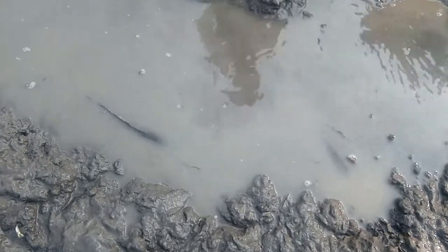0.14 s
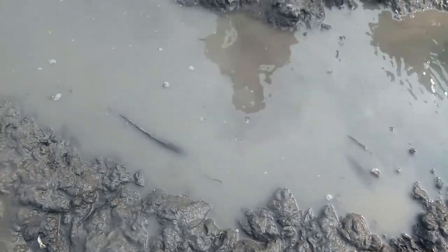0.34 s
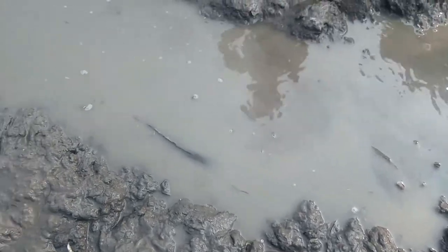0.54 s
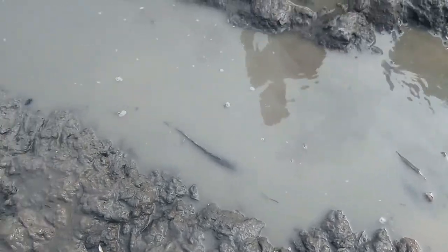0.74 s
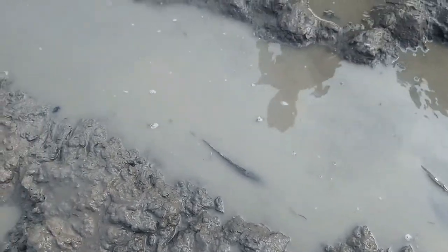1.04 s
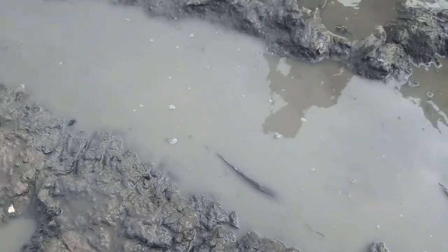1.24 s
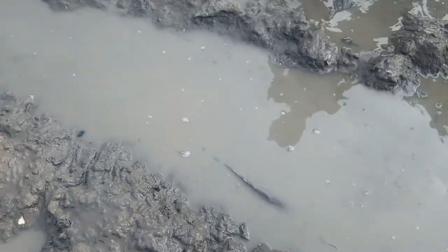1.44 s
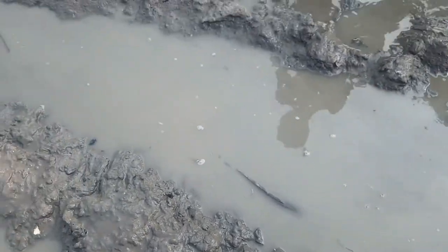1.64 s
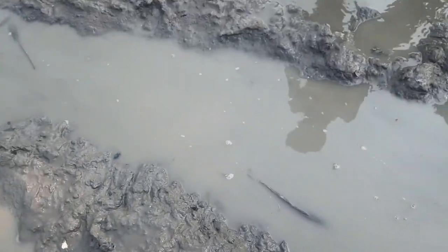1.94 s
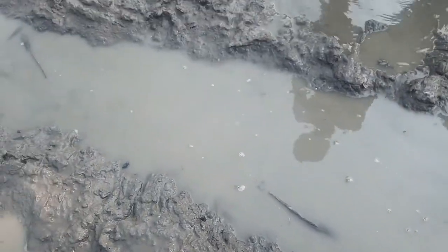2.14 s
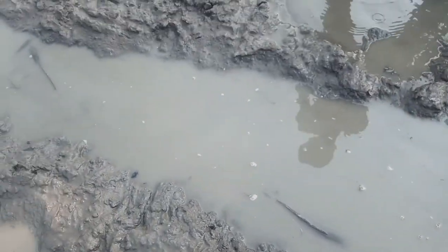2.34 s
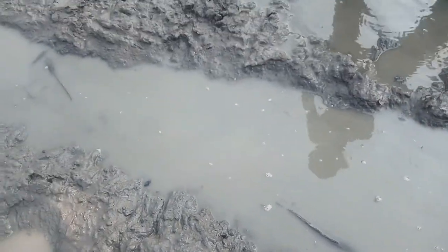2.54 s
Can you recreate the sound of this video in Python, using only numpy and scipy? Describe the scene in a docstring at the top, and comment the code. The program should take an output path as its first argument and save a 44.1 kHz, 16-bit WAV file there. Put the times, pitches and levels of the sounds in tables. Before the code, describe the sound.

Wading feet splash through shallow muddy water, with wet slaps, spray and small gurgling glugs

```python
"""Wading through a muddy pond

Feet wade through the shallow muddy water of a drained pond, a few metres away, in the open.
Twice a sheet of water is swept up as spray (dense tiny ringing bubbles), and lumps of wet mud slap
down (noise bursts with dull thuds). In between, water churns and sloshes (bubbles and rough hiss), and
air pockets glug (gliding tones). Banks scatter the sound; a light breeze (low noise) touches the microphone."""
import sys
import numpy as np
from scipy import signal
from scipy.fft import rfft, irfft
from scipy.io import wavfile

SR = 44100
rng = np.random.default_rng(int(sys.argv[2]) if len(sys.argv) > 2 else 0)


def persist_wave(psi):
    """Save psi, clipped to +-1, as 16-bit WAV."""
    counts = np.round(np.clip(psi, -1, 1) * 32767).astype(np.int16)
    wavfile.write(sys.argv[1], SR, np.atleast_2d(counts).T)


N = 119070
TIME = np.arange(N) / SR
IMPACT_ATTACK_S = .0009   # how quickly slaps and thuds build up


def from_db(db):
    """Turn decibels into gain."""
    return 10 ** (np.asarray(db) / 20)


def rms_one(x):
    """Scale a sound to unit power."""
    return x / np.sqrt(np.mean(x ** 2) + 1e-20)


def level(rows):
    """Follow a (time_s, level_db) curve, silent more than 0.03 s outside it."""
    times, db = np.transpose(rows)
    active = (TIME > times[0] - .03) * (TIME < times[-1] + .03)
    return from_db(np.interp(TIME, times, db)) * active


def colour(x, points):
    """Filter a sound by a (frequency_hz, level_db) curve, then set unit power."""
    hz, db = np.transpose(points)
    f = np.fft.rfftfreq(len(x), 1 / SR) + 1   # the 1 avoids log(0)
    gain = from_db(np.interp(np.log(f), np.log(hz), db))
    return rms_one(irfft(rfft(x) * gain, len(x)))


def noise(length):
    """Make white noise: independent random samples."""
    return rng.standard_normal(length)


def add(out, start_s, sound):
    """Mix a sound in at its start time."""
    i = int(np.clip(start_s * SR, 0, N - 1))
    out[i:i + len(sound)] += sound[:N - i]


def flicker(x):
    """Roughen a sound: each half octave flickers quickly in level at random."""
    depth_db, speed_hz = 2.5, 45
    octave = np.log2(np.fft.rfftfreq(N, 1 / SR) + 1)
    centres = np.arange(8, 14.1, .5)
    slow = signal.butter(2, speed_hz, fs=SR, output="sos")
    spectrum, out = rfft(x), np.zeros(N)
    for weights in np.eye(len(centres)):
        wander = rms_one(signal.sosfilt(slow, noise(N)))
        band = irfft(spectrum * np.interp(octave, centres, weights), N)
        out += band * from_db(depth_db * wander)
    return rms_one(out)


def droplets(per_s, spread_db, cycles, hiss):
    """Random clicks ring tiny bubbles, the small high ones most often; a share of hiss joins, all flickering."""
    pitches = np.geomspace(300, 14000, 44)
    shares = pitches ** .7 / np.sum(pitches ** .7)
    out = np.zeros(N)
    for hz, share in zip(pitches, shares):
        count = int(per_s * share * N / SR) + 1
        when, size, sign = rng.random((count, 3)).T
        loudness_db = spread_db * np.minimum(-np.log(1 - size), 3.5)   # few are loud
        sizes = from_db(loudness_db) * np.sign(sign - .5)
        clicks = np.bincount((when * N).astype(int), sizes, N) + 1e-12 * TIME   # never all zero
        # Each click rings at this pitch, fading 60 dB in the given number of cycles.
        r, w = from_db(-60 * hz / (cycles * SR)), 2 * np.pi * hz / SR
        ringing = signal.lfilter([1, 0, -1], [1, -2 * r * np.cos(w), r * r], clicks)
        out += np.sqrt(hz) * rms_one(ringing)   # higher bands are wider, so need more power
    return flicker(np.sqrt(1 - hiss) * rms_one(out) + np.sqrt(hiss) * noise(N))


def spray():
    """Each sheet of water swells and rains back as dense fine drops, heard as many brief rings."""
    # Loudness of each sheet: time_s, level_db
    sheets = [
        [(.185, -62), (.2, -42), (.228, -42), (.255, -36), (.325, -30.5), (.375, -37.5), (.44, -36), (.53, -64),
         (.68, -52)],
        [(1.67, -76), (1.745, -71), (1.76, -35.5), (1.82, -38), (1.9, -34), (1.945, -32.5), (2.0, -41.5),
         (2.09, -63), (2.16, -74)],
    ]
    # Tone of each sheet: frequency_hz, level_db (relative, per Hz)
    sheet_tones = [
        [(100, -18.5), (200, -9), (400, -11.5), (900, -9.5), (1600, -5), (3000, -2.5), (5000, -8), (6500, -8),
         (16000, -12)],
        [(100, -13), (200, -9.5), (400, -7.5), (900, -5), (1600, 1), (3500, 0), (5000, -4.5), (6500, -7),
         (16000, -10.5)],
    ]
    out = np.zeros(N)
    for sheet, tone in zip(sheets, sheet_tones):
        drops = droplets(per_s=6000, spread_db=3, cycles=9.9, hiss=.44)
        out += level(sheet) * colour(drops, tone)
    return out


def slaps():
    """A lump hits water: a crackling burst with uneven crater resonances, then a weak splatter tail."""
    # Slaps of mud and water: start_s, level_db (at the envelope's peak), decay_s, centre_hz, width_octaves
    slap_events = [(.001, -42.5, 0.012, 3520, 1.04), (0.093, -38.5, 0.0035, 3270, 0.13),
                   (0.191, -41, 0.014, 4550, 1), (.235, -31.5, 0.009, 4100, 1.6),
                   (.262, -29.5, 0.0045, 2850, 0.3), (0.4814, -22, 0.0085, 5940, 1.33),
                   (0.511, -29, 0.0011, 3680, 0.55), (0.5171, -22, 0.0041, 2530, 1.1),
                   (0.618, -39, 0.0055, 3800, 0.5), (0.889, -39, 0.017, 2970, 0.55),
                   (0.985, -36.5, 0.0032, 3910, 0.42), (1.1527, -30.5, 0.0032, 2750, 0.27),
                   (1.1575, -36, 0.0016, 1980, 0.36), (1.201, -31, 0.0028, 4100, 0.32),
                   (1.2329, -33, 0.0046, 1300, 0.74), (1.245, -34, .006, 1900, 0.87),
                   (1.287, -40, 0.015, 2220, 1.5), (1.336, -33.5, 0.0044, 3430, 0.71),
                   (1.382, -27, 0.0046, 3900, 0.62), (1.404, -31, 0.0085, 4500, 0.57),
                   (1.4436, -32.5, 0.0019, 4380, 0.44), (1.471, -40, 0.0047, 4470, 0.27),
                   (1.4932, -37.5, 0.0034, 4100, 0.23), (1.511, -31, 0.0023, 2400, 0.75),
                   (1.532, -39, .003, 4500, 0.17), (1.551, -33.5, 0.0032, 5050, 2.4),
                   (1.684, -40, .004, 3520, 0.63), (1.709, -34.5, .008, 4900, 0.89),
                   (1.753, -33.5, 0.0083, 2810, 0.45), (1.898, -31.5, 0.0085, 2950, 0.95),
                   (2.0395, -16.5, 0.0064, 4260, 1.8), (2.0618, -19.5, 0.0047, 3150, 0.76),
                   (2.093, -30.5, 0.0063, 3500, 1.6), (2.156, -40.5, .003, 3940, 0.15),
                   (2.1799, -38.5, 0.0037, 3300, 1.4), (2.211, -43.5, 0.0072, 2070, 0.61),
                   (2.246, -41.5, .003, 4500, 2.7), (2.292, -43.5, 0.014, 2800, 0.91),
                   (2.3206, -42, 0.0098, 3240, 0.23), (2.34, -36.5, 0.0073, 3400, .9),
                   (2.359, -28.5, 0.0037, 3630, 1.3), (2.383, -35, 0.0047, 4000, 0.38),
                   (2.418, -37, 0.007, 3780, 0.21), (2.465, -42, 0.0042, 3740, 0.62),
                   (2.581, -45.5, 0.0021, 3840, 0.48), (2.652, -39.5, 0.0073, 1790, 0.55),
                   (2.67, -45.5, 0.0086, 3680, 0.2)]
    skirt_db, splatter_db, splatter_s = -17, -14, .02
    uneven_db, ring_width_hz = 8, 200    # chance resonances of the splash crater
    crackle_db, crackle_s = 2, .00104    # the slap breaks into many tiny impacts
    out, t = np.zeros(N), TIME[:SR // 6]
    f = np.fft.rfftfreq(len(t), 1 / SR) + 1
    attack = 1 - np.exp(-(t / IMPACT_ATTACK_S) ** 2)
    splatter = from_db(splatter_db) * np.exp(-t / splatter_s)
    for start_s, db, decay_s, hz, octaves in slap_events:
        bumps = np.interp(f / ring_width_hz, np.arange(200), rng.uniform(-1, 1, size=200))
        crater = from_db(uneven_db * bumps)
        shape = np.exp(-.5 * (np.log2(f / hz) / octaves) ** 2) + from_db(skirt_db)
        burst = rms_one(irfft(rfft(noise(len(t))) * shape * crater, len(t)))
        envelope = attack * (np.exp(-t / decay_s) + splatter)
        crackle = from_db(crackle_db * np.interp(t / crackle_s, np.arange(300), noise(300)))
        size = from_db(db) * np.sqrt(np.mean(envelope ** 2)) / envelope.max()
        add(out, start_s, size * rms_one(burst * crackle * envelope))
    return out


def thuds():
    """Heavy lumps push the water: short, dull bursts of low noise."""
    # Pushes of heavy lumps: start_s, level_db (at the envelope's peak)
    thud_events = [(0.481, -30.5), (0.515, -39), (2.04, -42), (2.179, -46)]
    # Tone of the push: frequency_hz, level_db (relative, per Hz)
    thud_tone = [(40, -28), (120, -14), (280, 13.5), (500, -2.5), (1200, -3), (5000, -60)]
    decay_s = .0028
    out, t = np.zeros(N), TIME[:SR // 10]
    envelope = (1 - np.exp(-t / IMPACT_ATTACK_S)) * np.exp(-t / decay_s)
    envelope /= envelope.max()
    for start_s, db in thud_events:
        add(out, start_s, from_db(db) * envelope * colour(noise(len(t)), thud_tone))
    return out


def churn():
    """Stirred water trickles: mostly rough, flickering hiss, with small bubbles that ring for many cycles."""
    # How hard the water churns: time_s, level_db
    churn_level = [(0, -44), (.06, -47), (.16, -50), (.5, -38.5), (.62, -45), (.75, -45), (.9, -45),
                   (1.0, -48.5), (1.06, -54), (1.1, -49.5), (1.145, -48.5), (1.19, -36.5), (1.25, -40),
                   (1.36, -43), (1.41, -40.5), (1.52, -44), (1.64, -55.5), (1.75, -42.5), (1.95, -55),
                   (2.12, -44), (2.25, -57), (2.36, -47.5), (2.45, -52.5), (2.53, -55), (2.64, -57.5),
                   (2.67, -51), (2.7, -46)]
    # Tone of the trickle: frequency_hz, level_db (relative, per Hz)
    churn_tone = [(150, -16), (400, -26.5), (800, -19.5), (1500, -1.5), (3000, 2.5), (5000, -2.5),
                  (6500, -4.5), (16000, -2.5)]
    trickle = droplets(per_s=1800, spread_db=4, cycles=52, hiss=.7)
    return level(churn_level) * colour(trickle, churn_tone)


def slosh():
    """The body of water shoved round the legs gurgles: crowded bubbles, coloured towards low pitches."""
    # How hard the water sloshes: time_s, level_db
    slosh_level = [(0, -55.5), (.16, -60.5), (.22, -62), (.255, -39), (.295, -39.5), (.33, -31.5),
                   (.375, -43), (.44, -50), (.56, -50.5), (.7, -60.5), (.8, -55.5), (.89, -47.5),
                   (.99, -49.5), (1.08, -67.5), (1.16, -50), (1.24, -45.5), (1.34, -47), (1.44, -56.5),
                   (1.66, -66.5), (1.82, -45.5), (1.94, -55), (2.03, -54.5), (2.15, -62), (2.26, -62.5),
                   (2.36, -47.5), (2.5, -55), (2.6, -59.5), (2.7, -55.5)]
    # Tone of the gurgle: frequency_hz, level_db (relative, per Hz)
    slosh_tone = [(100, -31), (220, -5), (350, -6), (600, -1.5), (900, -2), (1300, -4), (2200, -8.5),
                  (5000, -30)]
    bubbles = droplets(per_s=10000, spread_db=2, cycles=17, hiss=.22)
    return level(slosh_level) * colour(bubbles, slosh_tone)


def glugs():
    """Trapped air rings with a rough wobble in loudness, mostly rising in pitch as it nears the surface."""
    # Air pockets and large bubbles: start_s, pitch_hz (at the start), level_db (envelope peak),
    # ring_s (to fade 60 dB), rise_octaves_per_s (at the start)
    pockets = [(.78, 194.4, -48, 0.31, -3.5), (0.804, 1033, -37, 0.045, 2), (0.828, 282, -30.5, 0.034, 9),
               (0.84, 330, -40, 0.15, 0), (0.87, 1430, -38.5, 0.013, 19), (0.879, 1025, -27.5, 0.026, 4.5),
               (.881, 617, -26, 0.014, 15), (.886, 275, -38.5, 0.047, 4), (.889, 503, -28.5, 0.044, 29),
               (0.918, 1030, -44, 0.031, -1), (.95, 1005, -44.5, 0.062, -7), (.973, 946, -36, 0.016, 0),
               (.977, 720, -36.5, 0.064, 1), (.993, 1855, -35.5, 0.016, -8), (.998, 722, -41, 0.034, 2),
               (1.049, 1220, -41, 0.044, 11), (1.126, 950, -42, 0.028, 25), (1.171, 616, -33.5, 0.026, 0),
               (1.207, 559, -31, 0.094, 1.5), (1.208, 253, -38, 0.092, 9), (1.195, 1315, -40, 0.019, 0),
               (1.246, 1048, -38, 0.055, 11), (1.256, 270.3, -40, 0.33, 17.5), (1.282, 275, -37, 0.056, 3),
               (1.286, 2034, -35, 0.063, 3.5), (1.306, 301, -27.5, 0.079, 14), (1.345, 820, -42, 0.021, 8),
               (1.385, 437, -38.5, 0.028, 16), (1.595, 923, -41.5, 0.023, 8),
               (2.04, 1221, -22.5, 0.019, 15.5), (2.294, 563, -41.5, 0.057, 12),
               (2.321, 1190, -41, 0.015, 12), (2.334, 1064, -33, 0.057, 8), (2.338, 343, -34.5, 0.047, 5),
               (2.36, 508, -24.5, 0.04, 19), (2.381, 970, -51, 0.042, 7), (2.409, 1093, -34.5, 0.05, 1.5),
               (2.4, 724, -47, .02, 2), (2.441, 1033, -35.5, 0.019, 6), (2.453, 1345, -41.5, 0.061, 9),
               (2.57, 570, -47.5, 0.025, 11)]
    swell_s, roughness = .0033, .14
    out, t = np.zeros(N), TIME[:SR // 5]
    swell = 1 - np.exp(-(t / swell_s) ** 2)
    for start_s, hz, db, ring_s, rise in pockets:
        wobble = colour(noise(len(t)), [(100, 2), (300, -3.5), (2000, -38)])
        pitch = hz * (1 + np.log(2) * rise * t)
        tone = np.sin(2 * np.pi * np.cumsum(pitch) / SR)
        envelope = swell * np.exp(-np.log(1000) * t / ring_s)
        envelope /= envelope.max()
        add(out, start_s, from_db(db) * envelope * tone * (1 + roughness * wobble))
    return out


def scatter(x, level_db, fade_s):
    """Sparse random echoes from lumpy surroundings, fading 60 dB in fade_s."""
    t = TIME[:SR // 3]
    hits = noise(len(t)) * (rng.random(len(t)) < 1500 / SR)   # about 1500 echoes per second
    echoes = hits * (t > .005) * np.exp(-np.log(1000) * t / fade_s)
    echoes /= np.sqrt(np.sum(echoes ** 2))
    return from_db(level_db) * signal.fftconvolve(x, echoes)[:N]


def breeze():
    """Light gusts at the microphone make a low rumble: deep noise that swells and fades."""
    # Strength of the rumble: time_s, level_db
    gusts = [(0, -64.5), (.3, -82), (.43, -53.5), (.48, -89), (.58, -67), (.71, -59.5), (.9, -83),
             (1.02, -56.5), (1.15, -67), (1.38, -59), (1.6, -65), (1.85, -73.5), (1.91, -54.5), (1.97, -73),
             (2.02, -45), (2.08, -54), (2.2, -58), (2.28, -54.5), (2.41, -50), (2.5, -68), (2.7, -64)]
    # Tone of the rumble: frequency_hz, level_db (relative, per Hz)
    rumble_tone = [(20, -25), (40, -17), (60, -6.5), (88, -0.5), (120, -4), (170, -12.5), (300, -22.5),
                   (1000, -42)]
    return level(gusts) * colour(noise(N), rumble_tone)


def open_air():
    """The open air is a faint steady noise."""
    # Tone of the air: frequency_hz, level_db (relative, per Hz)
    air_tone = [(30, -20), (150, 4), (500, -1.5), (1500, -33), (4000, -30), (8000, -8.5), (16000, 4)]
    return from_db(-53) * colour(noise(N), air_tone)


def scene():
    """Mix the water and air pockets, their echoes, the breeze and the open air."""
    water = spray() + slaps() + thuds() + churn() + slosh()
    pockets = glugs()
    off_banks = scatter(water, level_db=-15.5, fade_s=.075)
    off_legs_and_banks = scatter(pockets, level_db=-12.5, fade_s=.067)
    return (water + pockets + off_banks + off_legs_and_banks + breeze() + open_air())[None]


def record(dry):
    """The microphone drops steeply in the upper treble, with a faint peak and thin hiss below the cut-off."""
    # Tone of the steady hiss: frequency_hz, level_db (relative, per Hz)
    hiss_tone = [(8000, -15), (11500, -13), (13800, -14), (14900, -2), (15500, -2), (16000, -13)]
    edge_hz, peak_hz, cutoff_hz = 6692, 15000, 16300
    leak_db, peak_db, hiss_db = -28, -26, -78.5
    body = signal.sosfilt(signal.butter(18, edge_hz, fs=SR, output="sos"), dry)
    leak = signal.sosfilt(signal.butter(4, edge_hz, "high", fs=SR, output="sos"), dry)
    peak = signal.lfilter(*signal.iirpeak(peak_hz, 16, fs=SR), leak)
    hiss = from_db(hiss_db) * colour(noise(N), hiss_tone)
    heard = body + from_db(leak_db) * leak + from_db(peak_db) * peak + hiss
    return signal.sosfilt(signal.cheby2(20, 70, cutoff_hz, fs=SR, output="sos"), heard)


dry = scene()
out = record(dry)
persist_wave(out)
```